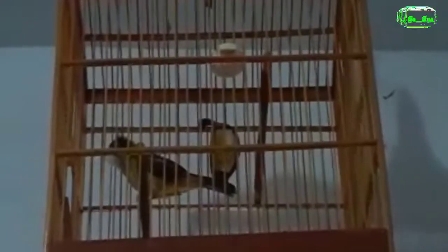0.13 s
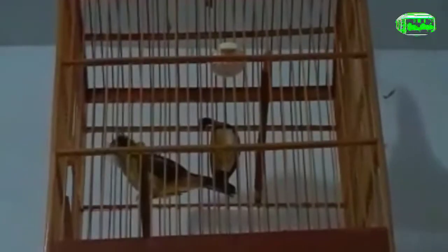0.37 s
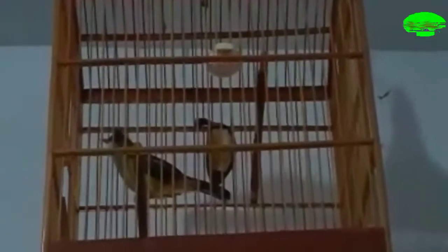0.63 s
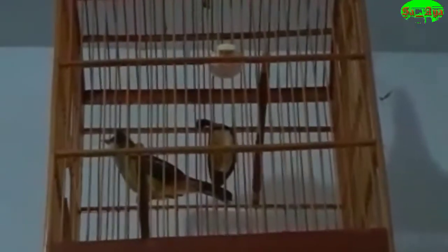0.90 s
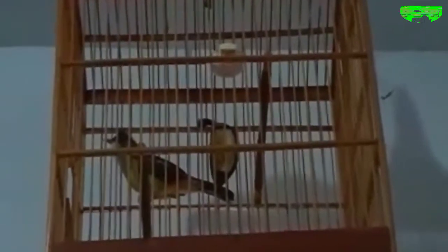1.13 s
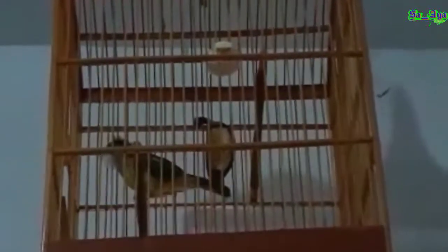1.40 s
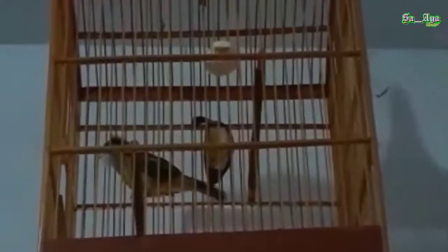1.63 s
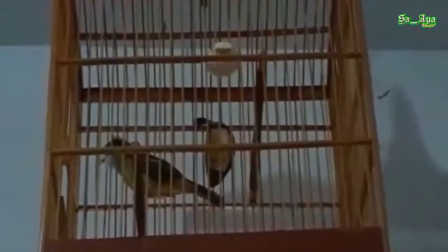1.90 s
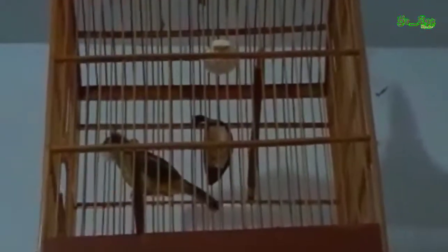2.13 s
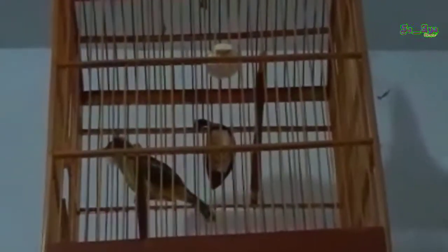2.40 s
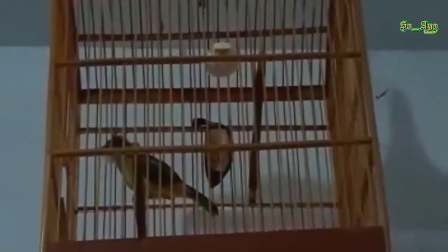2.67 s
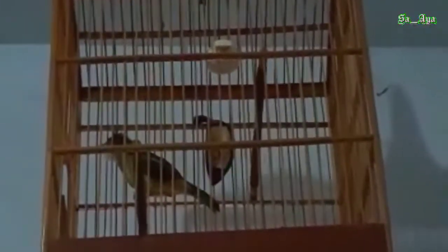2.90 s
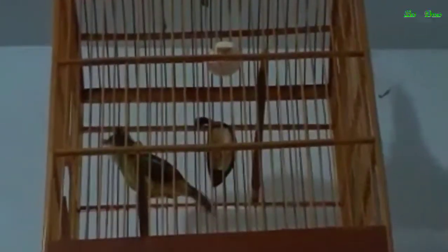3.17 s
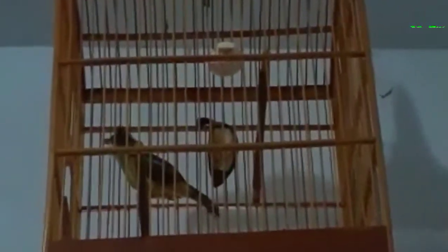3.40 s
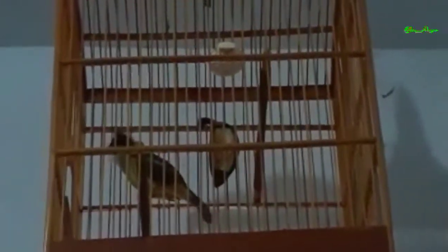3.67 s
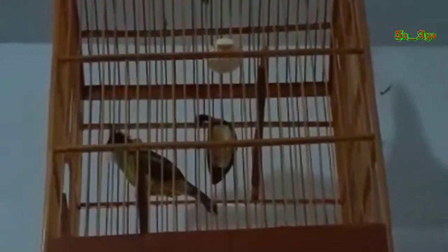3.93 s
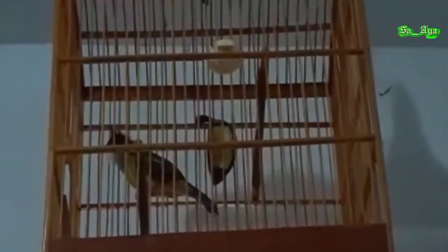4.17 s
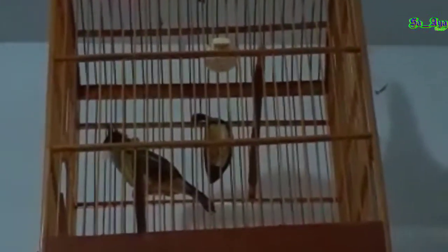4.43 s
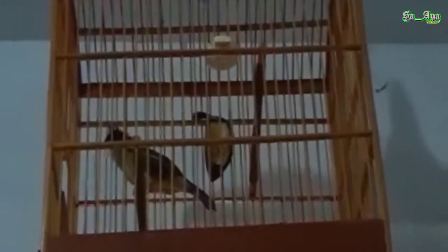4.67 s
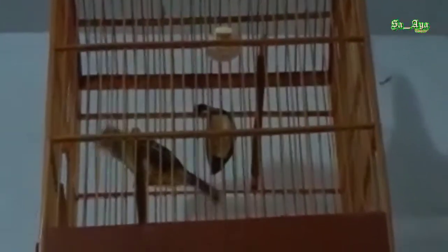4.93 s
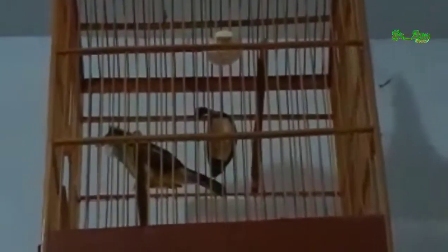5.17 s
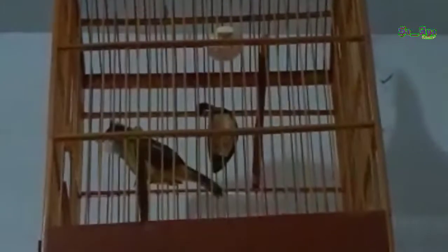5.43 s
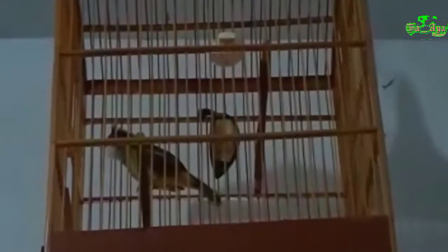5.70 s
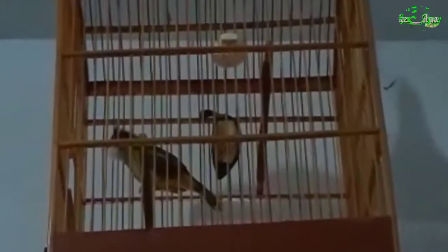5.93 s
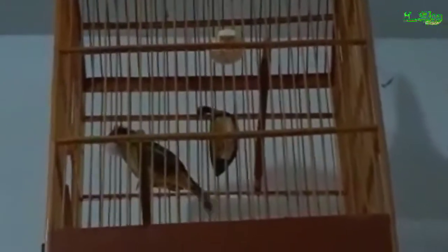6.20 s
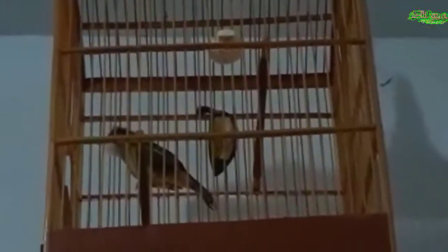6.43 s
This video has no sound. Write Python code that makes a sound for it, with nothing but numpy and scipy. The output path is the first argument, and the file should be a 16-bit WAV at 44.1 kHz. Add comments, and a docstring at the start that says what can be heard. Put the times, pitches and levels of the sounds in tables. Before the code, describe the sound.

A caged songbird scolds in a bare echoing room: sharp piercing chips, three harsh screeches, then more chips in bursts over dull street rumble.

```python
"""A caged songbird scolds in a bare, echoing room: short notes that whip up to a piercing tone, and three
long harsh screeches. Beneath lie street rumble, a low hum, a far rhythmic swish and a small engine slowing down.
The bird is gliding sine partials plus random slaps ringing throat resonances; street, hum and swish are
filtered noise, the engine is a stack of orders. The recorder's gain control ducks after loud calls."""
import sys
import numpy as np
from scipy import signal
from scipy.io import wavfile
from scipy.ndimage import uniform_filter1d

SR = 44100
rng = np.random.default_rng(int(sys.argv[2]) if len(sys.argv) > 2 else 0)


def master_out(mix):
    """Clip the mix to full scale and print it as 16-bit PCM to the path in sys.argv[1]."""
    frames = np.transpose(np.atleast_2d(mix))
    ceiling = np.clip(frames, -1, 1)
    pcm = np.round(ceiling * 32767).astype(np.int16)
    wavfile.write(sys.argv[1], SR, pcm)


def to_linear_factor(level_db):
    """Convert decibel levels (scalar or array-like) to linear amplitude factors."""
    exponent = np.asarray(level_db, float) / 20
    return 10 ** exponent


N = 289737   # samples in the scene

SWEEP_S, FALL_S = 0.024, 0.025   # glide up to the tone and down again


def rms_one(x):
    """Scale to unit rms."""
    return x / np.sqrt(np.mean(x ** 2) + 1e-20)


def at_hz(points, hz):
    """Read a table on a log-frequency axis."""
    table_hz, values = np.transpose(points)
    return np.interp(np.log(hz), np.log(table_hz), values)


def drift(rate_hz, size):
    """Slow random wander of spread 1: noise twice through a one-pole low-pass."""
    r = np.exp(-2 * np.pi * rate_hz / SR)
    noise = rng.standard_normal(size + 9000)
    settled = signal.lfilter([1], [1, -2 * r, r * r], noise)[9000:]
    return rms_one(settled)


def resonance(x, hz, width_hz):
    """Two-pole band-pass with gain 1 on top."""
    r = np.exp(-np.pi * width_hz / SR)
    zeros = np.array([1, 0, -1]) * (1 - r * r) / 2
    poles = [1, -2 * r * np.cos(2 * np.pi * hz / SR), r * r]
    return signal.lfilter(zeros, poles, x)


def bands(low_hz=25):
    """Third-octave band-passes with their centres."""
    edges = low_hz * 2 ** np.arange(0, np.log2(17000 / low_hz), 1 / 3)
    return [(np.sqrt(a * b), signal.butter(2, [a, b], "band", fs=SR, output="sos"))
            for a, b in zip(edges, edges[1:])]


def add(out, sound, s):
    """Mix a sound in at time s."""
    i = round(s * SR)
    out[i:i + len(sound)] += sound[:N - i]


def hum():
    """A low hum that swells and sinks: noise through one very narrow resonance."""
    hum_hz, width_hz, hum_db = 98.4, 2.3, -60
    ringing = rms_one(resonance(rng.standard_normal(N), hum_hz, width_hz))
    return to_linear_factor(hum_db + 1.0 * drift(0.83, N)) * ringing


def street():
    """Far traffic: stereo noise, alike in the bass, unrelated in the treble, each band wavering a little."""
    # colour of the rumble: f/Hz, relative level per Hz/dB
    colour = [(24, -46), (40, -17.5), (70, -15), (110, -9.5), (200, -9), (240, -12), (400, -8), (800, -10),
              (1200, -11), (1600, -13), (2200, -16.5), (4800, -26.5), (6300, -32), (8500, -29.5),
              (12100, -34), (15500, -38)]
    # loudness of the whole street: t/s, rms level/dB
    loudness = [(0, -41), (1.3, -40.5), (2.9, -42.5), (4.2, -40.5), (4.999, -40), (5.6, -36.5), (6.1, -39),
                (6.57, -38.5)]
    # left-right likeness: f/Hz, correlation (1 = same in both ears)
    likeness = [(60, 0.98), (180, 0.87), (550, 0.52), (1650, -0.19), (4970, 0.02), (15000, -0.032)]
    waver_db = 0.94
    out, white = 0, rng.standard_normal((2, 2, N))
    knots = np.arange(0, N, 64)
    for k, (hz, sos) in enumerate(bands()):
        mid, side = signal.sosfilt(sos, white[k % 2])
        alike = np.clip(at_hz(likeness, hz), -1, 1)
        # one value per 64 samples, so the waver is 64 times slower than 200 Hz
        waver = np.interp(np.arange(N), knots, drift(200, len(knots)))
        gain = to_linear_factor(at_hz(colour, hz) + waver_db * waver)
        out = out + gain * (np.sqrt(1 + alike) * mid + np.sqrt(1 - alike) * side * [[1], [-1]])
    s, db = np.transpose(loudness)
    return rms_one(out) * to_linear_factor(np.interp(np.arange(N) / SR, s, db))


def engine():
    """Low orders of one firing cycle; neighbours beat at the firing rate."""
    # course of the engine: t/s, fifth order f/Hz, common level of the orders/dB
    course = [(3.72, 208, -63), (3.95, 207, -53), (4.01, 207, -60), (4.09, 207, -45), (4.15, 207, -59),
              (4.27, 207, -47.5), (4.62, 201, -52.5), (4.66, 197, -56), (4.78, 183, -47.5),
              (4.92, 176, -41.5), (5.05, 167, -53), (5.12, 164, -47.5), (5.45, 163, -42.5),
              (5.97, 158, -49), (6.04, 153, -63)]
    # balance of the orders: multiple of the firing cycle, relative level/dB
    orders = [(3, -13), (4, -6.5), (5, 2.5), (6, -8.5), (8, -21), (9, -21), (10, -11.5), (11, -13)]
    s, fifth_hz, db = np.transpose(course)
    t = np.arange(N) / SR
    firing_hz = np.interp(t, s, fifth_hz) / 5
    phase = np.cumsum(2 * np.pi * firing_hz) / SR
    level = np.sqrt(2) * to_linear_factor(np.interp(t, s, db, left=-99, right=-99))
    return level * sum(to_linear_factor(order_db + 1.35 * drift(2.5, N)) * np.cos(k * phase) for k, order_db in orders)


def swishes():
    """Soft far puffs of bright noise, about a third of a second apart when they come in a row."""
    # puffs: onset t/s, noise level at the onset before the room/dB
    puffs = [(0.0186, -42.5), (0.2117, -36.5), (0.5994, -42.5), (0.9192, -43), (1.229, -41), (2.8886, -39),
             (4.139, -43), (4.5597, -36.5), (4.859, -40)]
    # colour of the puffs: f/Hz, relative level per Hz/dB
    colour = [(1200, 6), (2200, 10.5), (4000, 2), (6500, -2.5), (9000, -1.5), (13000, -16)]
    out, t = np.zeros(N), np.arange(round(0.12 * SR)) / SR
    for s, db in puffs:
        add(out, to_linear_factor(db) * rng.standard_normal(len(t)) * np.exp(-t / 0.025), s)
    rms_before = np.sqrt(np.mean(out ** 2))   # colouring leaves the overall level alone
    coloured = sum(to_linear_factor(at_hz(colour, hz)) * signal.sosfilt(sos, out) for hz, sos in bands(898))
    return rms_before * rms_one(coloured)


def tone(hz):
    """The syrinx whips up hoarsely to its pitch, locks onto it for a moment and breaks off."""
    # syrinx partials 1-5, the throat favours the second: level/dB
    partials = [-39, -0.5, -17, -24, -17]
    held_s = 0.024
    sweep_from, fall_to = 0.38, 0.7   # shares of the pitch
    waver_held, waver_gliding = 0.005, 0.1   # unsteadiness as a share of the pitch; gliding adds to held
    end = SWEEP_S + held_s + FALL_S
    t, corners = np.arange(round(end * SR)) / SR, [0, SWEEP_S, end - FALL_S, end]
    glide = np.interp(t, corners, [sweep_from, 1, 1, fall_to])
    loose = np.clip(np.abs(1 - glide) * 8.6, 0, 1)   # unsteady whenever it is off its pitch
    waver = (waver_held + loose * waver_gliding) * drift(553, len(t))
    phase = np.cumsum(np.pi * hz * glide * (1 + waver)) / SR   # fundamental at hz / 2: partial 2 is at hz
    flutter_db = (1 + 3 * loose) * np.clip(drift(250, len(t)), -2, 1.5)
    effort = to_linear_factor(np.interp(t, corners, [-25, -1.0, -16.5, -19]) + flutter_db)
    return effort * sum(to_linear_factor(db) * np.sin((k + 1) * phase) for k, db in enumerate(partials))


def rasp(length, gape, tone_hz, sag_db):
    """Irregular slaps of the membranes ring the throat; a wider beak lifts the upper resonances."""
    # throat for a 4500 Hz tone: f/Hz, width of each of two passes/Hz, level beak narrow/dB, beak wide/dB
    throat = [(1220, 1120, -23.5, -21.5), (1925, 690, -10, -13.5), (2850, 1350, -2, -4.5),
              (3930, 1440, -1.5, -11.5), (4445, 400, 5, -8), (5120, 1230, -16.5, -1),
              (6340, 970, -20.5, 10), (8270, 2600, -22.5, 0.5), (10650, 1400, -19.5, -6),
              (12140, 1700, -46, 7.5), (14400, 6700, -38, -11)]
    tuned_hz, slaps_per_s = 4500, 3000
    rise_s, opening_s_per_octave = 0.026, 0.013   # the beak opens: low resonances sound a little earlier
    wander_db = 2.5   # each resonance swells and sinks on its own
    lead, out = 2 * SWEEP_S, 0
    t = np.arange(round((lead + length + FALL_S) * SR)) / SR
    slaps = rng.standard_normal(len(t)) * (rng.random(len(t)) < slaps_per_s / SR)
    slaps = slaps * to_linear_factor(3 * np.clip(drift(90, len(t)), -2, 1.5))
    fall = t[-1] - FALL_S
    for k, (hz, width, narrow, wide) in enumerate(throat):
        opening = opening_s_per_octave * min(np.log2(hz / 4500), 0.1)
        full = min(lead + opening, fall - 0.001)
        swell_db = np.interp(t, [full - rise_s, full, fall, t[-1]], [-22, 0, sag_db, -55], left=-99)
        hz = hz * tone_hz / tuned_hz   # the bird tunes its throat to the tone
        rung = resonance(resonance(slaps + 1e-18, hz, width), hz, width) / np.sqrt(width / 800)
        gape_db = narrow + np.clip(gape, 0, 1) * (wide - narrow)
        level = to_linear_factor(gape_db + swell_db + wander_db * drift(27, len(t)))
        out = out + (-1) ** k * level * rung   # neighbours in opposite polarity
    return rms_one(out)


def bird():
    """A note is one tone with a short rasp; a screech is a long rasp in which the tone catches repeatedly."""
    # short notes: t of the tone's arrival/s, tone level/dB, loudest partial f/Hz, rasp rms level/dB, beak gape 0-1
    notes = [(1.324, -16, 4610, -18.5, 0.31), (1.4729, -11, 4600, -17, 0.52),
             (3.172, -16.5, 4495, -21, 0.28), (3.3363, -14.5, 4470, -18.5, 0.22),
             (3.492, -13.5, 4533, -18.5, 0.13), (3.706, -11, 4440, -17.5, 0.12),
             (5.4057, -20.5, 4425, -20.5, 0.28), (5.600, -10, 4550, -16.5, 0.2),
             (5.7585, -10.5, 4490, -17, 0.24), (5.916, -10, 4410, -16.5, 0.18),
             (6.075, -6.5, 4533, -16.5, 0.2), (6.244, -9.5, 4460, -17, 0.18),
             (6.5564, -13.5, 4600, -17.5, 0.25)]
    # screeches: t of the tone's arrival/s, rasp length/s, loudest partial f/Hz, rasp rms level/dB, beak gape 0-1
    screeches = [(1.703, 0.16, 4710, -15.5, 0.61), (1.972, 0.17, 4650, -13.5, 0.74),
                 (2.274, .18, 4616, -14.5, 0.72)]
    note_rasp_s, note_sag_db = 0.053, -11
    screech_sag_db, screech_tone_db, catch_every_s = -5, -10.5, 0.05
    gape_drowns_db = 9.5   # the screech's tone weakens as the beak gapes
    tones, rasps = np.zeros((2, N))
    for s, db, hz, rasp_db, gape in notes:
        add(tones, to_linear_factor(db) * tone(hz), s - SWEEP_S)
        add(rasps, to_linear_factor(rasp_db) * rasp(note_rasp_s, gape, hz, note_sag_db), s - 2 * SWEEP_S)
    for s, length, hz, rasp_db, gape in screeches:
        add(rasps, to_linear_factor(rasp_db) * rasp(length, gape, hz, screech_sag_db), s - 2 * SWEEP_S)
        for k, (late, strength) in enumerate(rng.standard_normal((4, 2))):
            if k * catch_every_s < length:
                catch_s = s + (k + 0.15 * late * (k > 0)) * catch_every_s   # the first catch is punctual
                catch_db = screech_tone_db - gape_drowns_db * gape + 2.8 * strength
                add(tones, to_linear_factor(catch_db) * tone(hz), catch_s - SWEEP_S)
    return tones, rasps


def room(x):
    """Dense reflections, other ones for each ear, build up and die band by band."""
    # reverberation: f/Hz, time to fall by 60 dB/s
    decay = [(1000, 0.75), (2600, 0.66), (4500, 0.61), (7000, 0.56), (12000, 0.46)]
    room_db, build_s = 0.22, 0.0011
    t = np.arange(SR) / SR
    white = rng.standard_normal((2, SR))
    tail = sum(signal.sosfilt(sos, white) * to_linear_factor(-60 * t / at_hz(decay, hz)) for hz, sos in bands(400.0))
    tail = tail * (1 - np.exp(-t / build_s))
    tail = tail / np.sqrt(np.sum(tail ** 2, axis=1, keepdims=True))   # unit energy in each ear
    return to_linear_factor(room_db) * signal.fftconvolve(x[None], tail, axes=1)[:, :N]


def wall_echoes(x):
    """Distinct slaps back from facing walls, a little later and weaker on the right."""
    # echoes as the left ear gets them: delay t/s, level/dB
    echoes = [(.030, -7), (.052, -9.5)]
    out = np.zeros((2, N))
    for s, db in echoes:
        add(out[0], to_linear_factor(db) * x, s)
        add(out[1], to_linear_factor(db - 3) * x, 1.06 * s)
    return out


def scene():
    """Bird direct and through the room, swishes through the room, over engine, hum and street."""
    direct_db = [[1.5], [-6.5]]   # left, right
    right_lag = 18   # samples the right ear is late
    tone_to_room_db = -8   # the tone is beamed forward
    rasp_direct_db = -5   # the rasp spreads all round
    tones, rasps = bird()
    near = tones + to_linear_factor(rasp_direct_db) * rasps
    direct = np.array([near, np.pad(near, (right_lag, 0))[:N]])
    reflected = room(to_linear_factor(tone_to_room_db) * tones + rasps + swishes()) + wall_echoes(near)
    return to_linear_factor(direct_db) * direct + reflected + engine() + hum() + street()


def low_pass(x):
    """Removes everything above the highest recorded frequency."""
    return signal.sosfilt(signal.butter(12, 15700, fs=SR, output="sos"), x)


def record(dry):
    """Gain control turns loud passages down and lets go slowly; the input stage rounds the peaks."""
    knee_db, cut_share = -20.5, 0.2   # share of the excess over the knee that is taken off
    release_db_per_s, smoothing_s = 0.5, 0.5
    right_db = -1
    power = uniform_filter1d(np.mean(dry ** 2, axis=0), size=2048)
    cut_db = cut_share * np.maximum(10 * np.log10(power + 1e-12) - knee_db, 0)
    slope = release_db_per_s * np.arange(N) / SR
    held_db = np.maximum.accumulate(cut_db + slope) - slope   # falls no faster than the release
    r = np.exp(-1 / (smoothing_s * SR))
    smooth_cut_db = signal.lfilter([1 - r], [1, -r], held_db)
    x = dry * to_linear_factor(-smooth_cut_db) * to_linear_factor([[0], [right_db]])
    x = 0.9 * np.tanh(x / 0.9)
    return low_pass(x)


dry = scene()
out = record(dry)
master_out(out)
```